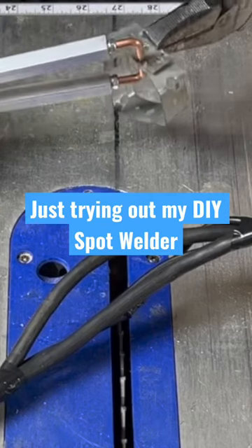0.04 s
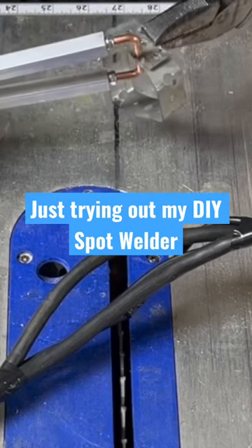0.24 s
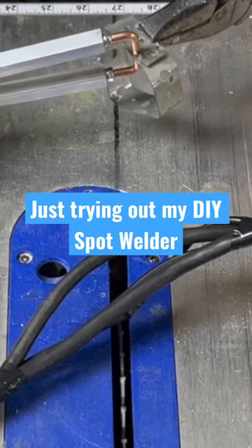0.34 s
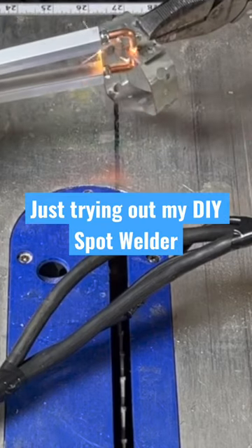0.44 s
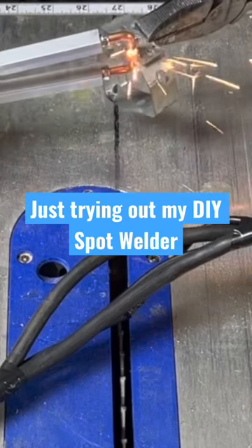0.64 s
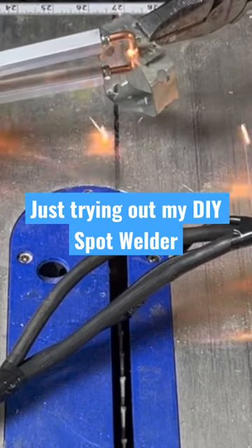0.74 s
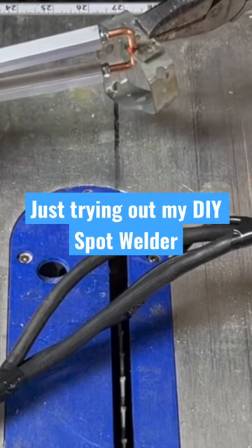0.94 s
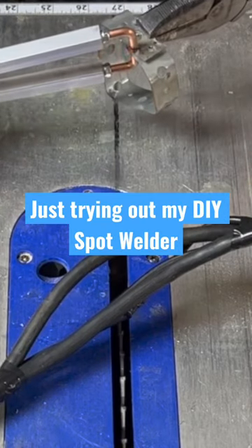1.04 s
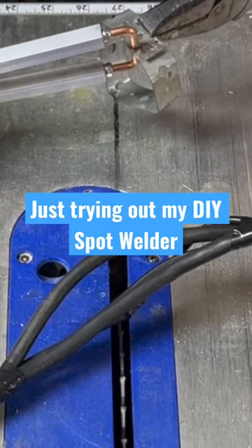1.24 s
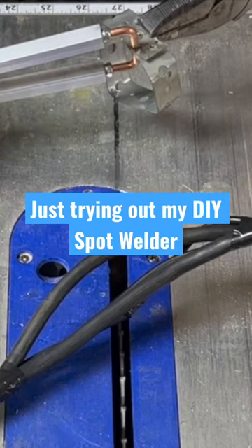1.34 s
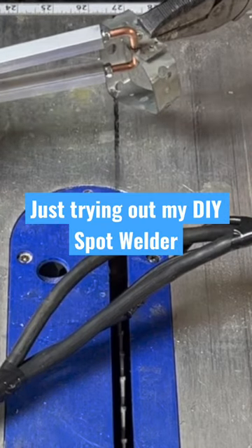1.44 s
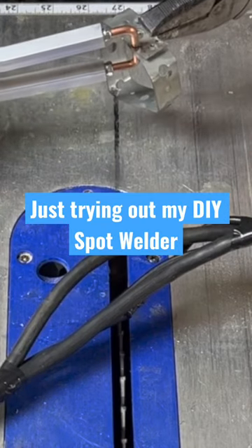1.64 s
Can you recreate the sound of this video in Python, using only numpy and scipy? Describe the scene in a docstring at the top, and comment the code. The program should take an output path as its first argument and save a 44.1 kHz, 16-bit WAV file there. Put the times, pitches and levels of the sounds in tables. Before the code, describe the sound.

A spot welder clacks on, buzzes harder with sizzling spits, then ends in a sharp pop

```python
"""A switch clacks, a buzz grows harder and harder, hot metal sizzles and spits, and a sharp pop ends it.
A home-made spot welder makes one weld on thin sheet metal, close by in a small workshop.
The buzz is a sum of waves at and around multiples of twice the mains rate, with some rough noise.
Clack, spits and pop are short noise bursts; struck metal adds fading tones. The sizzle is pulsing noise.
A low hum lingers briefly over rumble and hiss, both made of filtered noise."""
import sys
import numpy as np
from scipy import signal
from scipy.fft import rfft, irfft, next_fast_len
from scipy.io import wavfile

SR = 44100
rng = np.random.default_rng(int(sys.argv[2]) if len(sys.argv) > 2 else 0)


def wav_out(sig):
    """Save sig, one row per channel (or a flat mono array), as 16-bit PCM at SR to the path in sys.argv[1]."""
    wavfile.write(sys.argv[1], SR, np.round(np.clip(np.atleast_2d(sig).T, -1, 1) * 32767).astype(np.int16))


N = 74970
T = np.arange(N) / SR   # time in seconds
LEFT_RIGHT = np.array([[1], [-1]])   # opposite signs for the two channels

# Waves in the buzz. Each row: multiple of the buzz rate, rms level early in the weld in dB,
# rms level late in the weld in dB, both before the swell of the current.
BUZZ_PARTIALS = [(1, -40, -39.5), (2, -50.5, -56), (2.5, -56.5, -56.5), (3, -37, -38.5), (3.5, -74, -70),
                 (4, -47.5, -48), (5, -64, -46.5), (5.5, -55, -62.5), (6, -54.5, -54), (7, -68.5, -64),
                 (8, -52.5, -51.5), (9, -49, -51.5), (10, -65, -64), (11, -60, -50.5), (12, -62, -74),
                 (13, -56, -58), (14, -61, -53.5), (15, -83, -59.5)]
# Colour of the rough part of the buzz. Each row: frequency in Hz, relative level in dB.
RASP_COLOUR = [(25, -25), (65, -4), (150, -5), (290, -0.5), (500, -2), (1000, -12), (1700, -10.5),
               (2300, -38), (6000, -41)]
# Colour of the sizzle. Each row: frequency in Hz, relative level in dB.
SIZZLE_COLOUR = [(500, 9), (1500, -0.5), (2800, 4.5), (5000, -3), (8500, 1.5), (10200, -5.5), (11800, 2.5),
                 (13800, -10), (15500, -0.5)]
# Loudness of the sizzle over time. Each row: time in seconds, level in dB.
SIZZLE_LEVEL = [(.26, -47), (.315, -47.5), (.345, -43), (.385, -50), (.43, -58), (.49, -54.5), (.55, -48),
                (.61, -46.5), (.65, -49), (.69, -51.5)]
# Colour of the arcs and spits. Each row: frequency in Hz, relative level in dB.
ARC_COLOUR = [(60, -36), (1000, -33), (6000, -27), (8400, 9.5), (10000, -4.5), (11300, 7), (12800, 7.5),
              (14000, -11), (15500, 6.5)]
# Single spits. Each row: start in seconds, starting level in dB.
SPITS = [(.3185, -39), (.3345, -31), (.5433, -41), (.5605, -45), (.5675, -41), (.594, -38), (.6012, -28),
         (.610, -39), (.626, -42), (.6345, -42), (.866, -56)]
# Sparks that land. Each row: start in seconds, starting level in dB.
SPARK_LANDINGS = [(.323, -38), (.3305, -50), (.407, -38), (.4325, -31), (.867, -55)]
# Colour of a landing spark. Each row: frequency in Hz, relative level in dB.
LANDING_COLOUR = [(500, 3), (1500, 6.5), (3200, 21.5), (6000, -7.5), (15000, -25)]
# The pop is a quick double crack. Each row: start in seconds, relative level in dB.
POP_CRACKS = [(.7038, 5), (.7047, -1)]
# Colour of the pop heard directly. Each row: frequency in Hz, relative level in dB.
POP_COLOUR = [(60, -11.5), (450, 2), (780, -27), (1100, -0.5), (1800, 2.5), (2080, -9.5), (2600, 7),
              (3050, -1.5), (3500, 13), (4400, -16), (5200, -3.5), (7300, -5), (9300, -1), (11500, -6),
              (15000, 4)]
# Colour of the pop as it spreads all round into the room. Each row: frequency in Hz, relative level in dB.
POP_AROUND_COLOUR = [(60, -14.5), (250, 0), (450, -1), (1100, -3), (1800, 2), (2600, 4.5), (3100, 1),
                     (5000, -4), (7500, -2), (10000, -2), (12000, 5), (15000, 2)]
# Ringing of the sheet and tongs at the pop. Each row: frequency in Hz, starting level in dB,
# time to fall by 60 dB in seconds.
POP_MODES = [(430, -25, .022), (1100, -21, .013), (1800, -25, .012), (2600, -25, .016), (3550, -26, .014),
             (10800, -20, .008), (12400, -19, .008), (15000, -22, .008)]
# The contacts close and bounce. Each row: start in seconds, relative level in dB.
CONTACTS = [(.2497, 3), (.2509, 2), (.2526, -3.5)]
# Colour of the clack. Each row: frequency in Hz, relative level in dB.
CLACK_COLOUR = [(60, -47.5), (300, -8.5), (900, -19), (2000, -12), (2450, 0), (2750, 13.5), (3200, -7),
                (3800, -2.5), (5000, -1.5), (8000, -2.5), (10500, -11.5), (12500, 1.5), (16000, -2.5)]
# Ringing of the switch. Each row: frequency in Hz, level in dB, time to fall by 60 dB in seconds.
SWITCH_MODES = [(2720, -44, 0.042), (2800, -38.5, 0.066), (4730, -58, .015), (5630, -54, 0.04),
                (7080, -37.5, 0.04), (8580, -26, .02), (12220, -58, 0.0087)]
# Thump of the case as the current comes on. Each row: frequency in Hz, level in dB,
# time to fall by 60 dB in seconds.
THUMP_MODES = [(275.4, -41, 0.21), (289, -37.5, 0.13), (447, -48, 0.3)]
# How strongly the room answers. Each row: frequency in Hz, level in dB.
ROOM_COLOUR = [(100, -4), (300, 3.5), (700, 1), (1500, -6), (2100, -7), (2700, -11), (4200, -2), (6000, -1),
               (8500, -2.5), (10500, -12), (15500, -12.5)]
# Colour of the rumble. Each row: frequency in Hz, relative level in dB.
RUMBLE_COLOUR = [(25, -21.5), (50, 0), (82, 5.5), (120, 5.5), (170, -4), (300, -12), (600, -21.5),
                 (1500, -60.5)]
# Loudness of the rumble over time. Each row: time in seconds, level in dB.
RUMBLE_LEVEL = [(0, -59), (.22, -58), (.95, -61.5), (1.15, -62.5), (1.29, -57), (1.39, -58), (1.54, -56.5),
                (1.7, -60)]
# Colour of the steady hiss. Each row: frequency in Hz, relative level in dB.
HISS_COLOUR = [(25, -8.5), (200, 13), (700, 3), (1500, 0), (2900, -6), (4000, -6.5), (5100, -0.5),
               (6500, -4.5), (8700, -4.5), (10200, -32.5), (12000, -13), (14000, -34.5)]
# Faint swells of hiss. Each row: time of the peak in seconds, width in seconds, level at the peak in dB.
HISS_SWELLS = [(1.15, 0.016, -68), (1.64, 0.053, -68)]
# Colour of those swells. Each row: frequency in Hz, relative level in dB.
SWELL_COLOUR = [(2000, -21), (4000, -11.5), (5000, 5.5), (6500, -9.5), (9000, -26.5), (12000, -38)]

ON_S, OFF_S, HUM_END_S = .2494, .7037, .845
BUZZ_HZ = 119.88
BUZZ_ATTACK_S, BUZZ_RELEASE_S, CURRENT_DB_PER_S = 0.036, 0.0095, 16
SURGE_S, SURGE_RISE_S = 0.58, 0.099   # the partials glide to their late levels
RATTLE_S, RATTLE_RISE_S = 0.317, 0.013   # the upper partials reach full strength late
RATTLE_ABOVE_HZ, BEFORE_RATTLE_DB = 450, -3
PULSE_S, BUZZ_LAG_S = .6968, .0001   # time of one buzz pulse; the right port hears it later
PHASE_SPREAD, WAVER_DB, LINGER_DB = 0.84, 1.3, -49.5   # spread in radians
RASP_DB, RASP_SIDE = -46.5, 0.64
SIZZLE_STEADY, SIZZLE_PULSE_S, SIZZLE_ROUGH_DB, SIZZLE_SIDE = 0.83, 0.0024, 3, 0.74
ARCS_S, ARCS_DB, ARCS_DB_PER_S, ARC_DECAY_S = .3403, -30, -170, 0.0013
LANDING_DECAY_S = 0.0018
POP_DB, POP_DECAY_S, POP_WET_DB = -15, 0.0014, -1.5   # wet: extra gain into the room
CLACK_DB, CLACK_DECAY_S, THUMP_S = -20.5, 0.0018, .2535
SWITCH_WET_DB, RING_WET_DB = 3, -7.5   # the ring sends less into the room than the clack
SWITCH_LAG_S, WELD_LAG_S, PORTS_APART_HZ = 0.000102, 0.0001729, 1960
ROOM_T60_S, ROOM_BUILD_S, ROOM_ALIKE_HZ = 0.23, 0.0018, 1100
RUMBLE_SIDE, HISS_DB, HISS_SIDE, HISS_PAN_DB = .15, -66.5, 0.94, 1
LOW_CUT_HZ, CUTOFF_HZ = 43, 15800


def amp(db):
    """Turn decibels into gain."""
    return 10 ** (np.asarray(db) / 20)


def rms_one(x):
    """Scale to unit rms."""
    return x / np.sqrt(np.mean(x ** 2) + 1e-20)


def level(rows):
    """Gain along a curve of times and decibels."""
    return amp(np.interp(T, *np.transpose(rows)))


def colour(x, spectrum, keep_power=True):
    """Filter with the given spectrum, without sounding ahead of the input (minimum phase)."""
    size = next_fast_len(2 * N)
    hz, db = np.transpose(spectrum)
    bins_hz = np.arange(size // 2 + 1) * SR / size
    gain = amp(np.interp(np.log(bins_hz + 1), np.log(hz), db))
    if keep_power:
        gain = rms_one(gain)
    # folding the cepstrum forward in time gives the phase
    cepstrum = irfft(np.log(gain), size)
    cepstrum[1:size // 2] *= 2
    cepstrum[size // 2 + 1:] = 0
    response = np.exp(rfft(cepstrum))
    return irfft(rfft(x, size) * response, size)[..., :N]


def noise(spectrum, side):
    """Stereo noise of unit rms; side weighs the part that differs between the ears."""
    mid, diff = colour(rng.standard_normal((2, N)), spectrum)
    return rms_one(mid + side * diff * LEFT_RIGHT)


def drift(rate):
    """Random wandering through rate new values a second, drawn with spread 1."""
    return np.interp(T * rate, np.arange(N), rng.standard_normal(N))


def dying(start, decay_s):
    """Sudden start, then exponential decay."""
    return (T >= start) * np.exp(-np.maximum(T - start, 0) / decay_s)


def bursts(rows, decay_s, spectrum):
    """A short crack of noise for each row of start and level."""
    power = sum((amp(db) * dying(start, decay_s)) ** 2 for start, db in rows)
    return colour(np.sqrt(power) * rng.choice([-1, 1], N), spectrum)


def ring(start, modes):
    """Struck metal: each mode is a sine that dies away."""
    out = 0
    for hz, db, t60 in modes:
        envelope = amp(db) * dying(start, t60 / np.log(1000))
        out = out + envelope * np.sin(2 * np.pi * hz * (T - start))
    return out


def ports(x, lag_s):
    """Two microphone ports: alike in the bass, the left one later in the treble."""
    low = signal.sosfiltfilt(signal.butter(2, PORTS_APART_HZ, fs=SR, output="sos"), x)
    treble = x - low
    return low + np.array([np.interp(T + way * lag_s / 2, T, treble) for way in (-1, 1)])


def transformer():
    """Mains partials and rasp swell with the current, then fall at the pop; the lowest partial lingers."""
    after_off = np.maximum(T - OFF_S, 0)
    swell = amp(CURRENT_DB_PER_S * np.minimum(T - OFF_S, 0))
    attack = 1 - np.exp(-np.maximum(T - ON_S, 0) / BUZZ_ATTACK_S)
    # most of it stops fast, a smaller part fades slowly
    release = 0.77 * np.exp(-after_off / BUZZ_RELEASE_S) + 0.28 * amp(-60 * after_off / .3)
    current = swell * release * attack
    rattle = amp(BEFORE_RATTLE_DB * np.clip(1 - (T - RATTLE_S) / RATTLE_RISE_S, 0, 1))
    linger = amp(LINGER_DB) * (T > OFF_S) * np.clip((HUM_END_S - T) / 0.0052 + .5, 0, 1)
    surge = np.clip((T - SURGE_S) / SURGE_RISE_S, 0, 1)
    buzz = 0
    for multiple, early_db, late_db in BUZZ_PARTIALS:
        db = early_db + surge * (late_db - early_db)
        hz = BUZZ_HZ * round(2 * multiple) / 2
        gain = amp(db + WAVER_DB * drift(30)) * current
        if hz > RATTLE_ABOVE_HZ:
            gain = gain * rattle
        if hz == BUZZ_HZ:
            gain = np.maximum(gain, linger)
        phase = PHASE_SPREAD * rng.standard_normal() + np.pi * hz * BUZZ_LAG_S * LEFT_RIGHT
        buzz = buzz + np.sqrt(2) * gain * np.cos(2 * np.pi * hz * (T - PULSE_S) + phase)
    return buzz + amp(RASP_DB) * current * noise(RASP_COLOUR, RASP_SIDE)


def sizzle():
    """Hot metal fizzes: noise that flares on every current peak."""
    since_peak = (T - ARCS_S) % (1 / BUZZ_HZ)
    pulse = SIZZLE_STEADY + np.exp(-since_peak / SIZZLE_PULSE_S)
    flare = rms_one(pulse * amp(SIZZLE_ROUGH_DB * drift(700)))
    weld_on = (T > ON_S) * (T < OFF_S)
    return level(SIZZLE_LEVEL) * weld_on * flare * noise(SIZZLE_COLOUR, SIZZLE_SIDE)


def sparks():
    """A fading run of ten arcs, one on each current peak, with single spits and sparks that land."""
    run = [(ARCS_S + s, ARCS_DB + ARCS_DB_PER_S * s) for s in np.arange(10) / BUZZ_HZ]
    spits = bursts(run + SPITS, ARC_DECAY_S, ARC_COLOUR)
    landings = bursts(SPARK_LANDINGS, LANDING_DECAY_S, LANDING_COLOUR)
    return ports(spits + landings, WELD_LAG_S)


def pop():
    """The weld ends with a sharp double crack that rings the sheet and tongs."""
    crack = amp(POP_DB) * bursts(POP_CRACKS, POP_DECAY_S, POP_COLOUR)
    return ports(crack + ring(POP_CRACKS[0][0], POP_MODES), WELD_LAG_S)


def pop_around():
    """The crack as it spreads in all directions into the room, with its own colour."""
    return amp(POP_DB + POP_WET_DB) * bursts(POP_CRACKS, POP_DECAY_S, POP_AROUND_COLOUR)


def switch(ring_db=0):
    """The contacts clack shut and bounce, the switch rings, then the case thumps."""
    clack = amp(CLACK_DB) * bursts(CONTACTS, CLACK_DECAY_S, CLACK_COLOUR)
    body = ring(CONTACTS[0][0], SWITCH_MODES) + ring(THUMP_S, THUMP_MODES)
    return ports(clack + amp(ring_db) * body, SWITCH_LAG_S)


def workshop(x):
    """Dense reflections that die quickly, alike at both ears in the bass."""
    mid, side = rng.standard_normal((2, N))
    side = signal.sosfilt(signal.butter(1, ROOM_ALIKE_HZ, "high", fs=SR, output="sos"), side)
    build_up = 1 - np.exp(-(T / ROOM_BUILD_S) ** 2)
    tail = np.array([mid + side, mid - side]) * amp(-60 * T / ROOM_T60_S) * build_up
    tail = colour(rms_one(tail) / np.sqrt(N), ROOM_COLOUR, keep_power=False)
    return signal.fftconvolve(x, tail, axes=1)[:, :N]


def background():
    """Uneven low rumble and a faint hiss, slightly louder on the left, that swells twice."""
    rumble = level(RUMBLE_LEVEL) * amp(1.0 * drift(25)) * noise(RUMBLE_COLOUR, RUMBLE_SIDE)
    hiss = amp(HISS_DB + 0.45 * drift(19.75)) * noise(HISS_COLOUR, HISS_SIDE)
    swells = sum(amp(db) * np.exp(-((T - peak) / width) ** 2) for peak, width, db in HISS_SWELLS)
    hiss = hiss + swells * noise(SWELL_COLOUR, HISS_SIDE)
    return rumble + hiss * amp(HISS_PAN_DB / 2 * LEFT_RIGHT)


def scene():
    """The welder in its room; switch, sizzle, sparks and pop excite the reverberation."""
    weld = sizzle() + sparks()
    spreading_pop = pop_around()
    room = workshop(amp(SWITCH_WET_DB) * switch(RING_WET_DB) + weld + spreading_pop)
    return switch() + weld + pop() + room + transformer() + background()


def record(dry):
    """Filters cut the deepest bass and the top of the treble."""
    dry = signal.sosfilt(signal.butter(2, LOW_CUT_HZ, "high", fs=SR, output="sos"), dry)
    return signal.sosfilt(signal.ellip(10, .2, 80, CUTOFF_HZ, fs=SR, output="sos"), dry)


dry = scene()
out = record(dry)
wav_out(out)
```